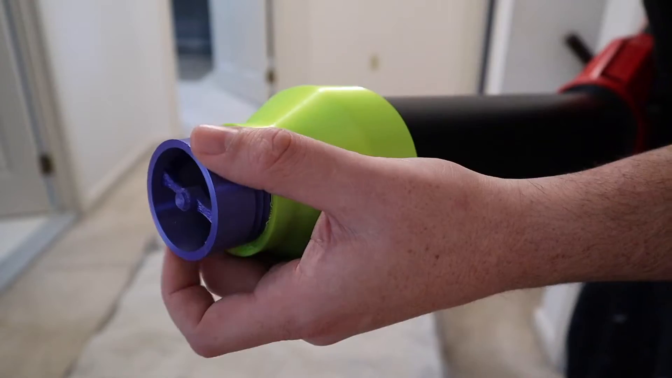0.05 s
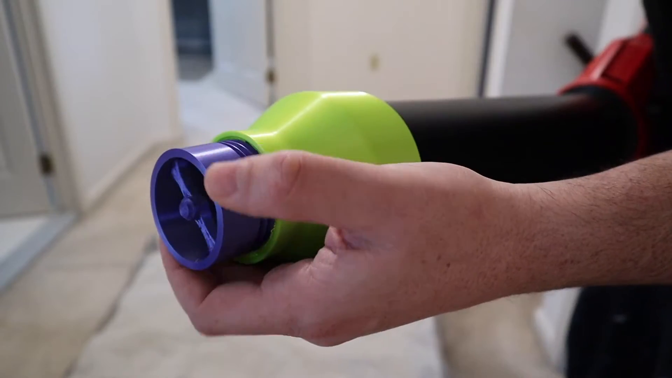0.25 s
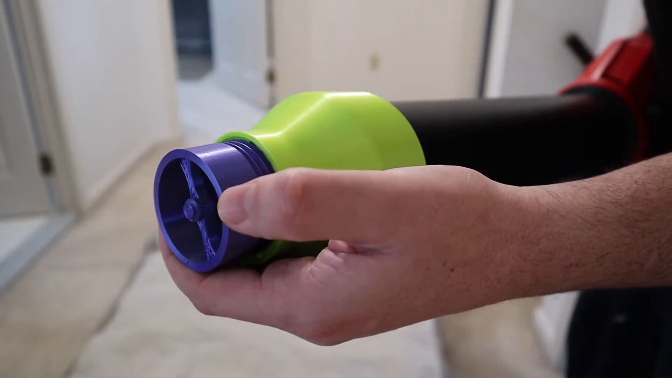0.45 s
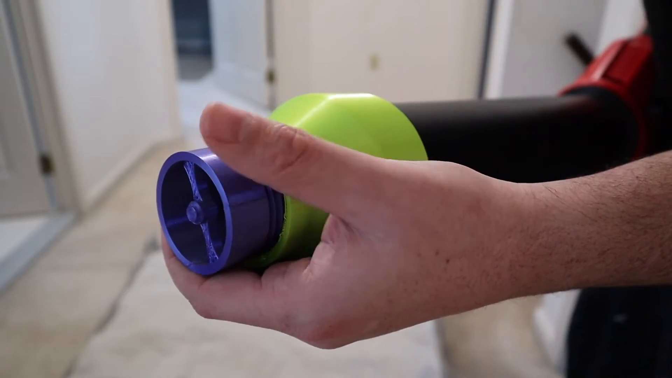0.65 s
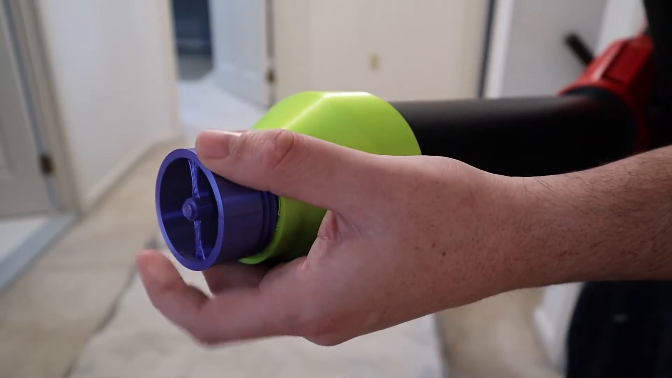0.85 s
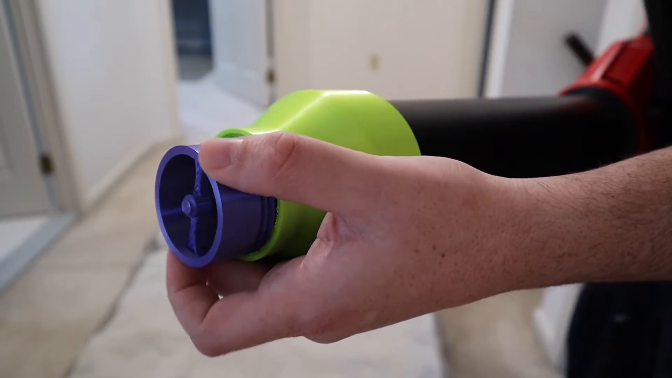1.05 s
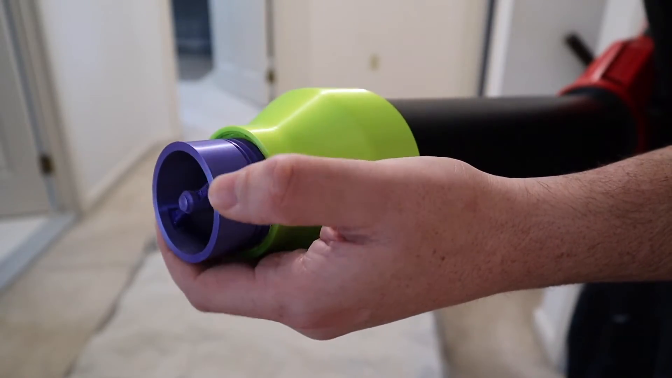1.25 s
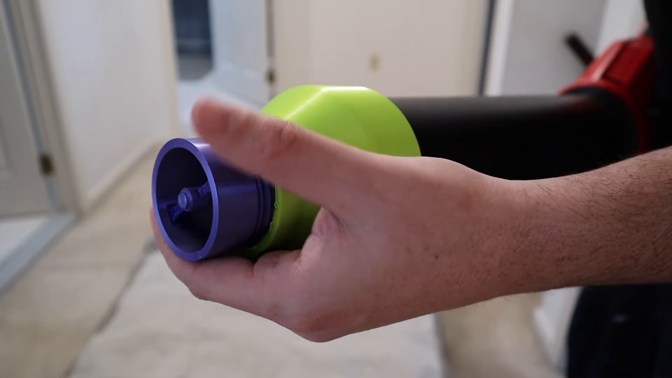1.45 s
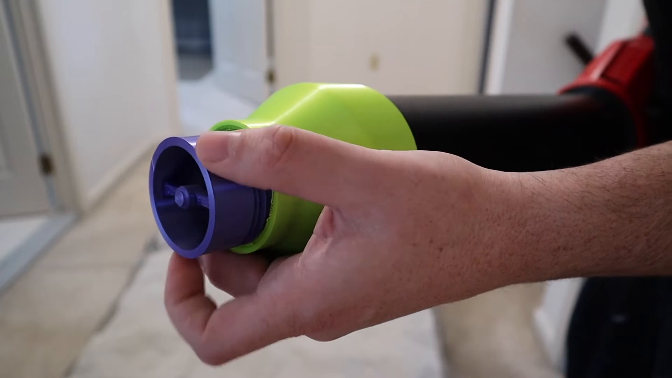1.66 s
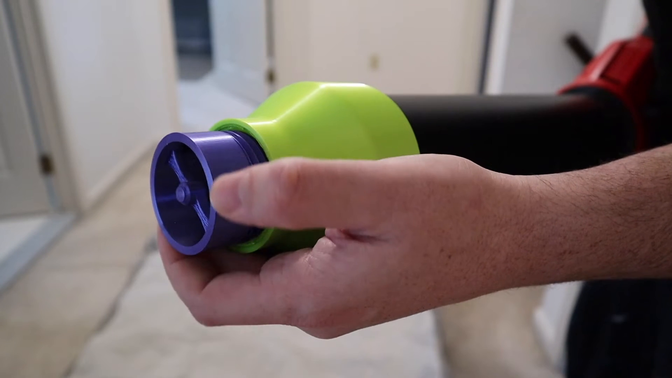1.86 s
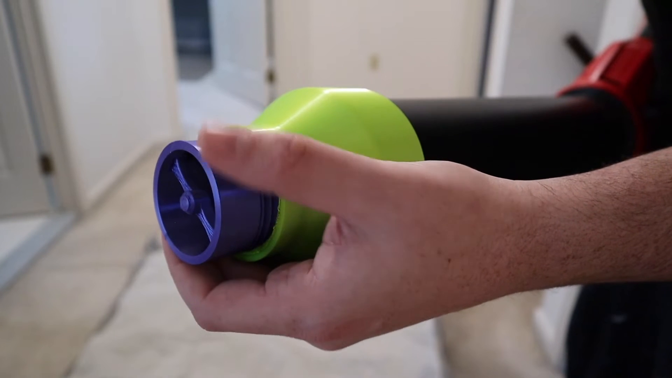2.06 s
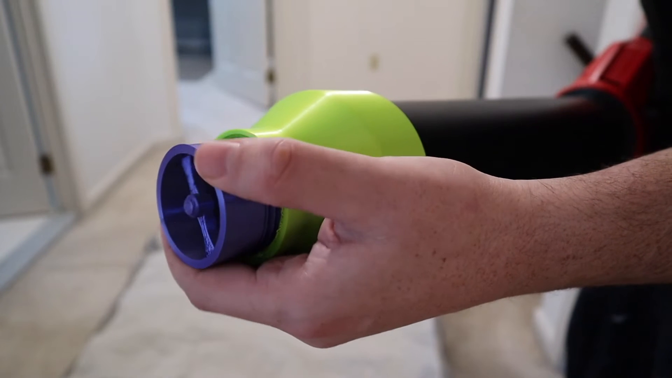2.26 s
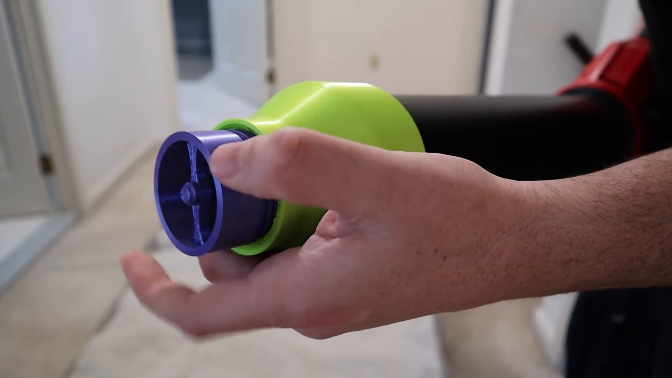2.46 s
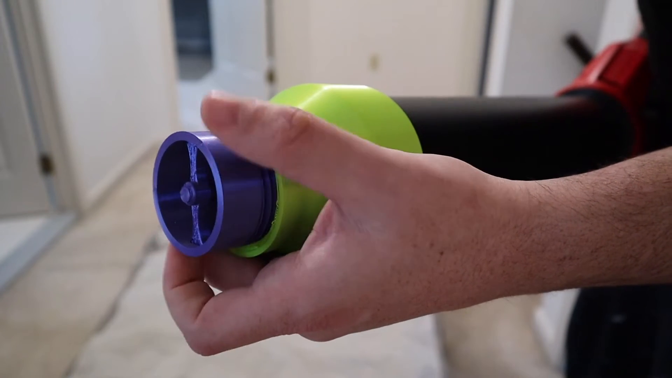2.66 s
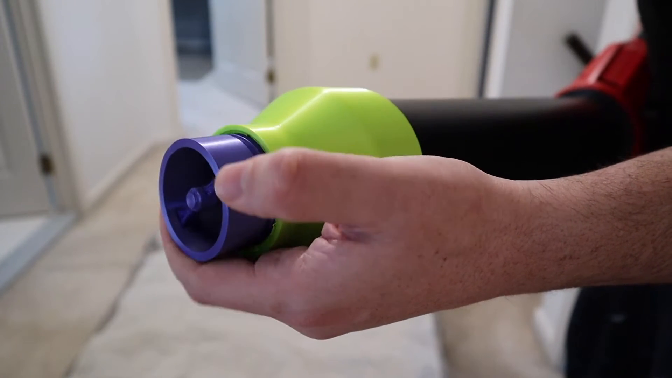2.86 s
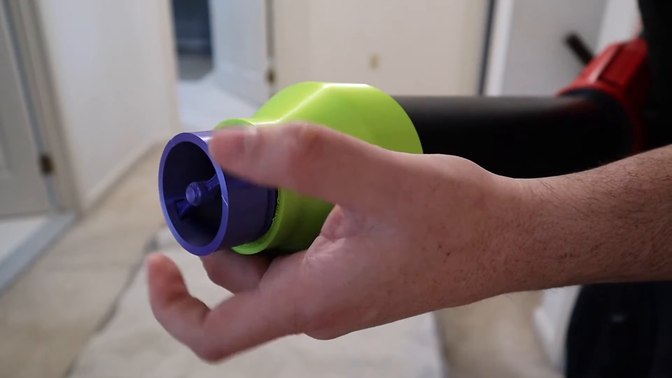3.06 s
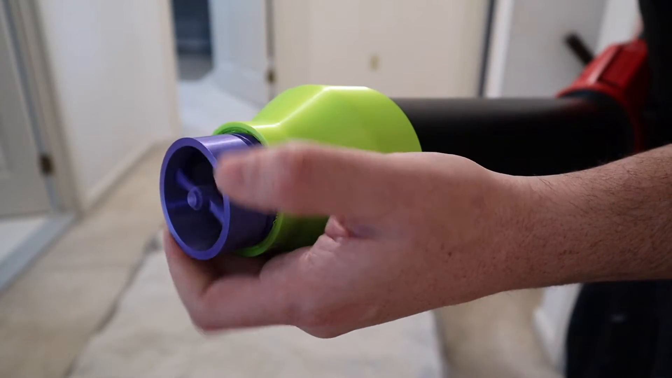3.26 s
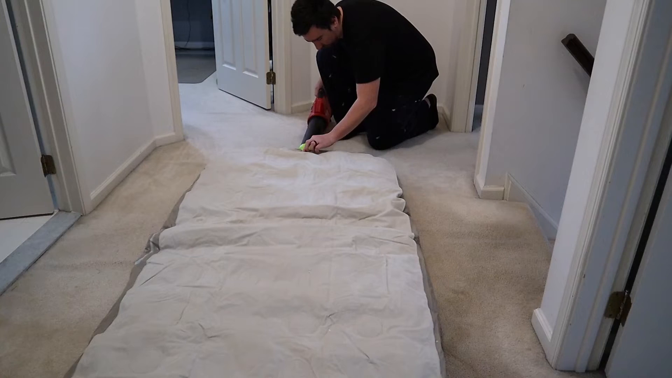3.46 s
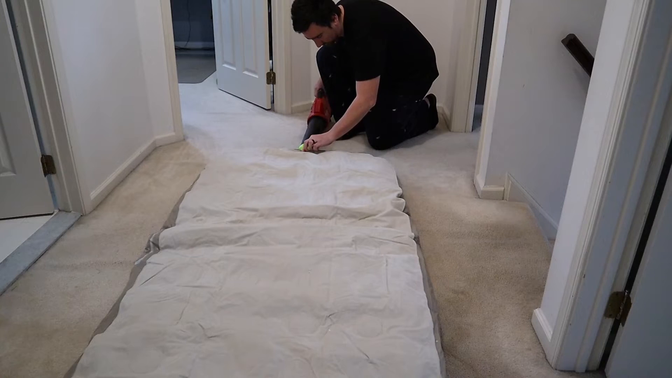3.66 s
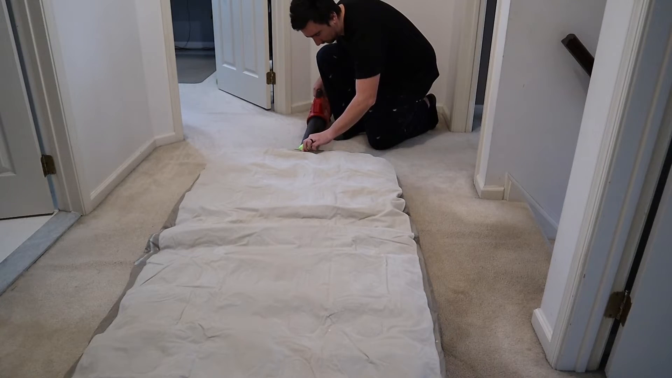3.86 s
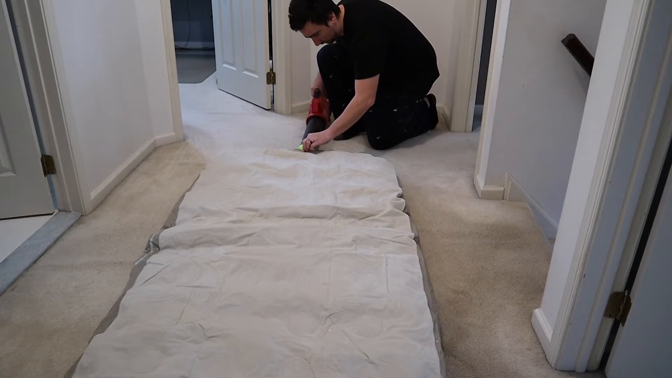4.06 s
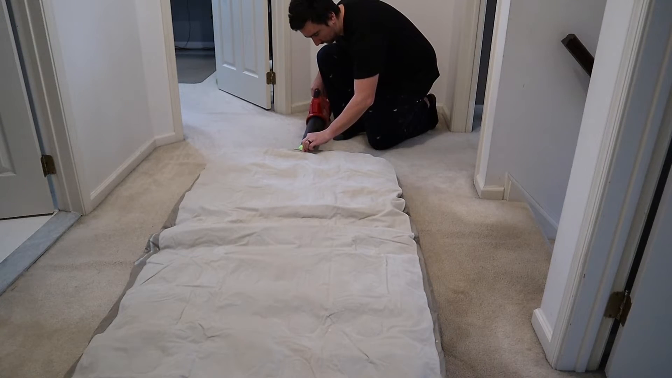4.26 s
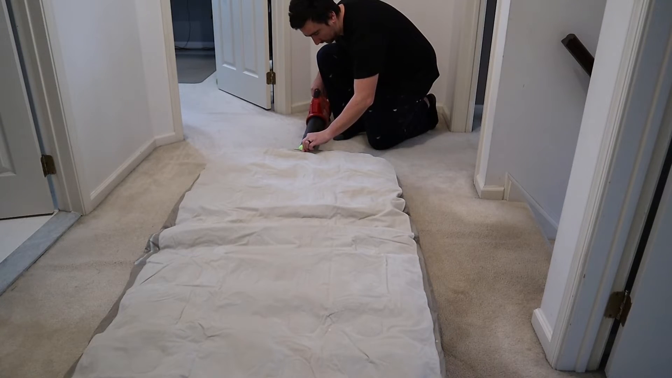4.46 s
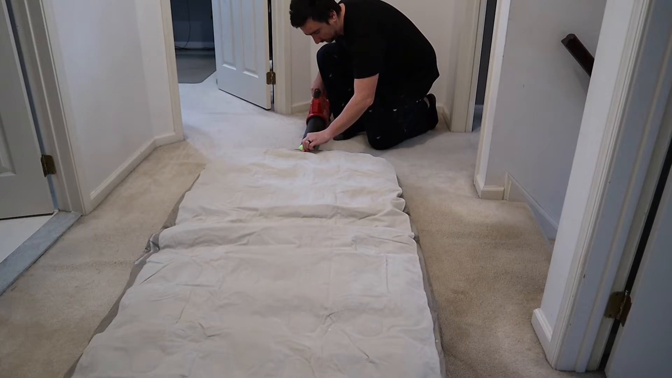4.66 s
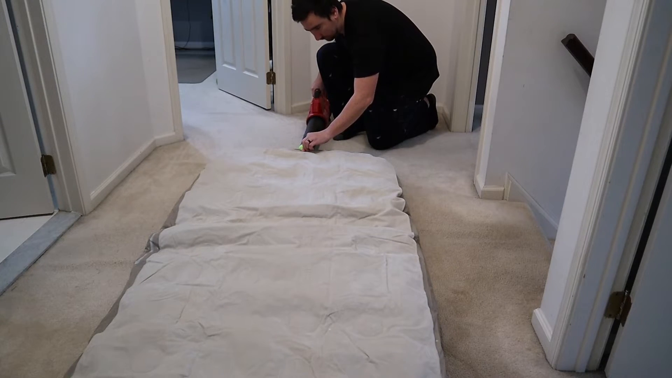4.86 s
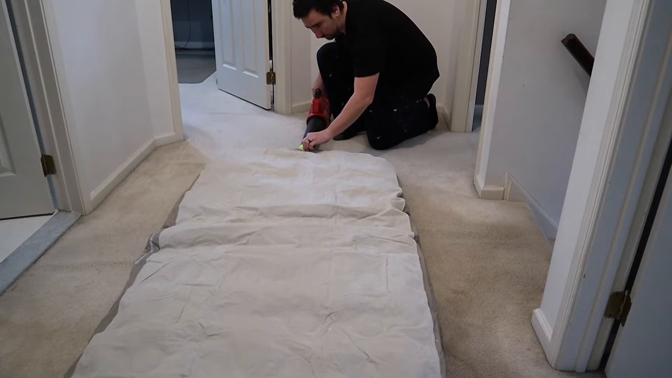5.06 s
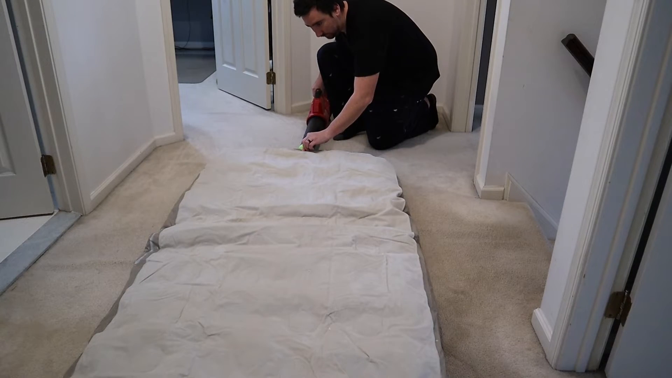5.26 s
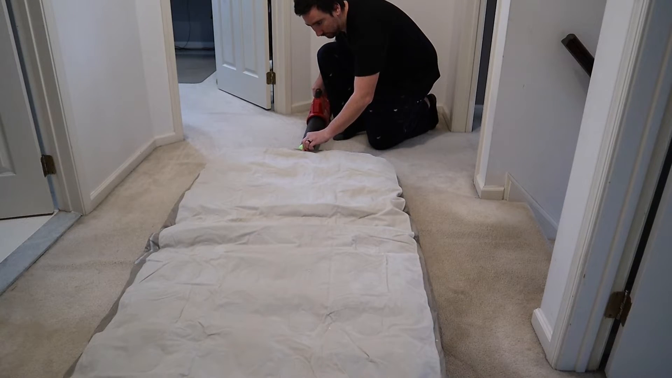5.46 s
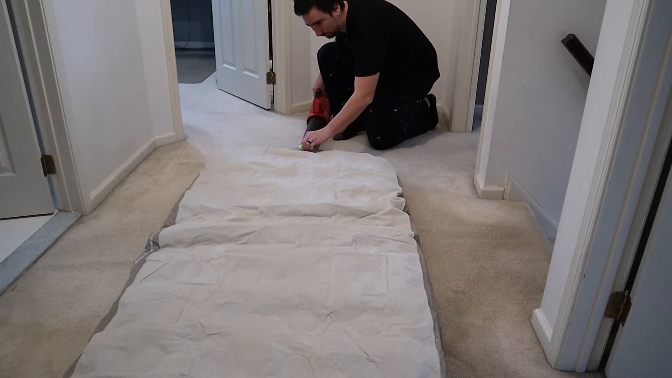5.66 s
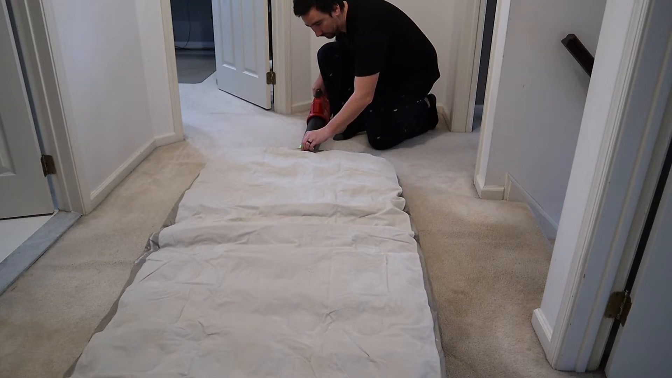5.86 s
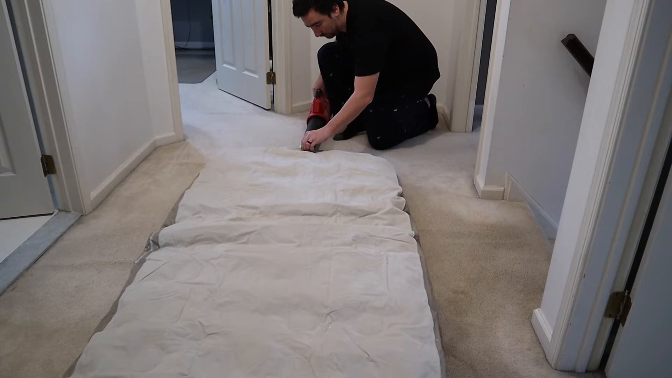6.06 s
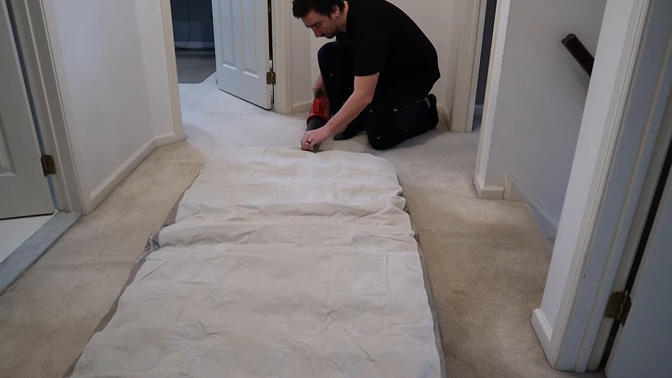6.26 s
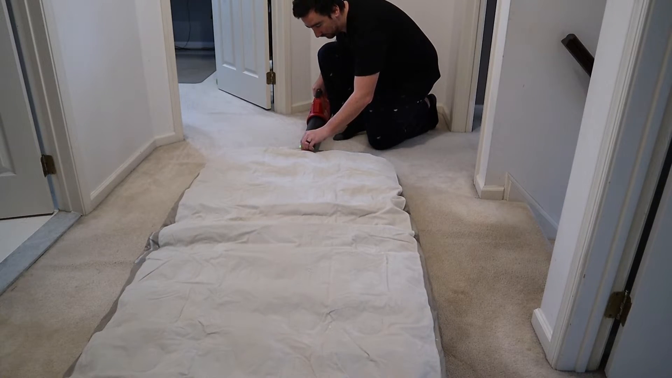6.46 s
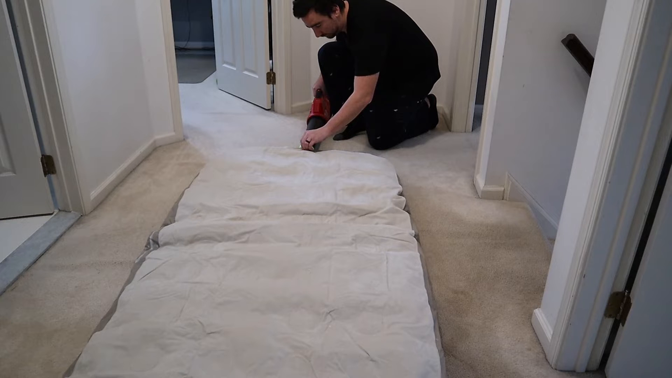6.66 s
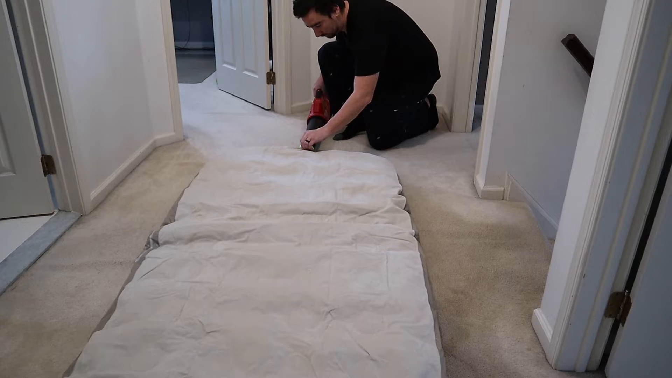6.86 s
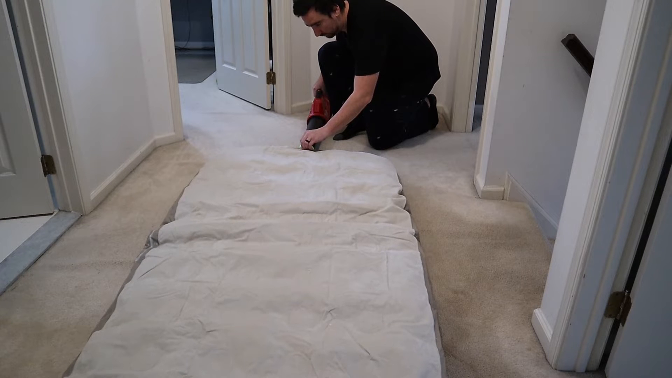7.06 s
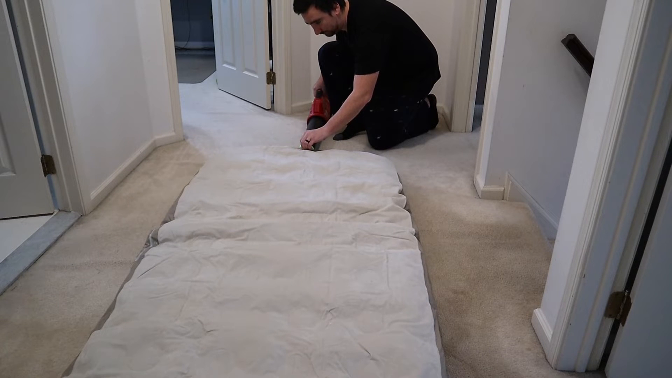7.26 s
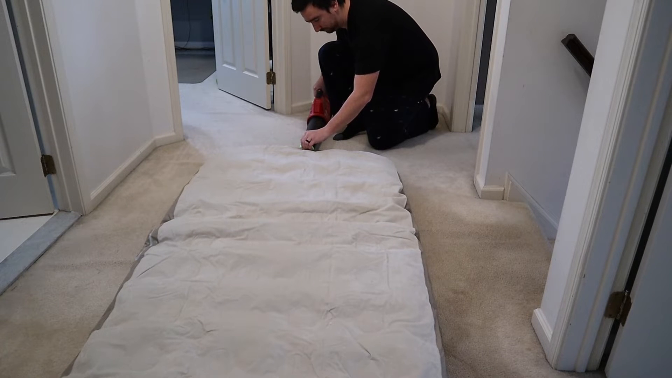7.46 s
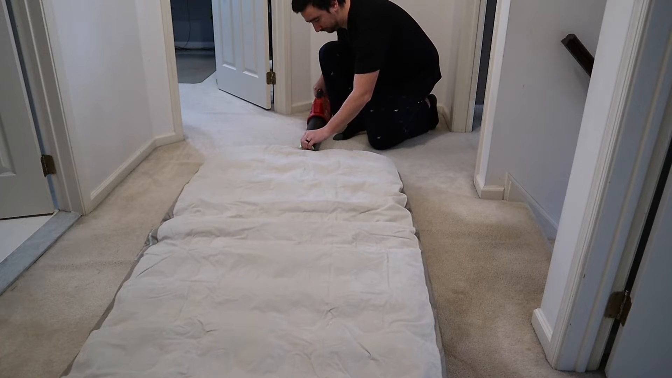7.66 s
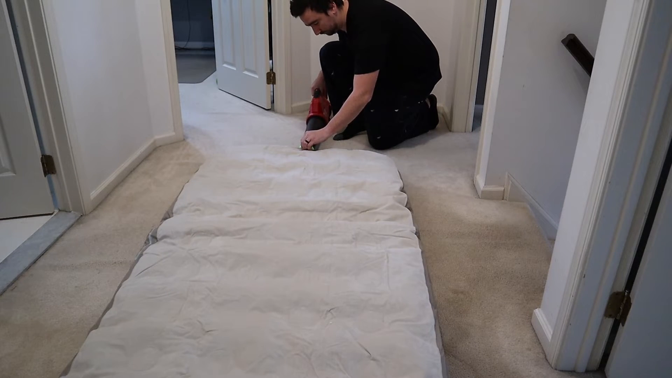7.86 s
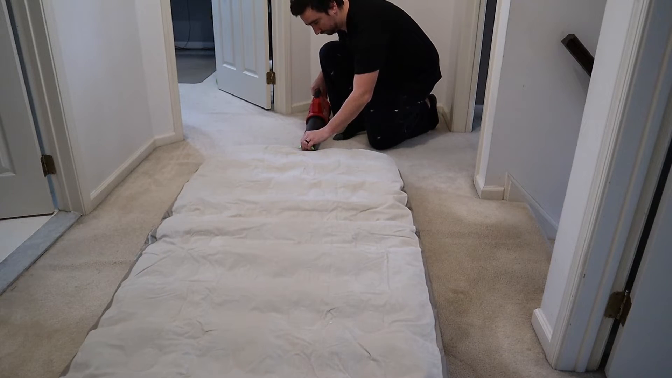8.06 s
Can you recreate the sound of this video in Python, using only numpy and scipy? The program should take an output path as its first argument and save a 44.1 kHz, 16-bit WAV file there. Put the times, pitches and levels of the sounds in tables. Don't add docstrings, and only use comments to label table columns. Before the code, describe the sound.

Hard plastic clicks and hollow scrapes up close, then a cordless blower rattles into a steady airy roar with whine, abruptly jumping to a shrill sped-up hiss.

```python
import sys
import numpy as np
from scipy import signal
from scipy.fft import rfft, irfft, next_fast_len
from scipy.io import wavfile
from scipy.ndimage import uniform_filter1d

SR = 44100
rng = np.random.default_rng(int(sys.argv[2]) if len(sys.argv) > 2 else 0)


def field_ratio(decibels):
    return 10 ** (np.asarray(decibels, dtype=float) / 20)


def put_to_file(sound):
    columns = np.atleast_2d(sound).T
    safe = np.clip(columns, -1, 1)
    whole_steps = np.round(safe * 32767)
    wavfile.write(sys.argv[1], SR, whole_steps.astype(np.int16))


N = 357651
T = np.arange(N) / SR
SCENE_CUT_S, SPEED_CUT_S, FADE_S = 3.408, 6.637, 0.012
SPEED_UP = 3


def unit(x):
    return x / np.sqrt(np.mean(x ** 2))


def curves(table):
    s, *columns = np.transpose(table)
    return [np.interp(T, s, c) for c in columns]


def lookup(x, table):
    return np.interp(x, *np.transpose(table))


def walk(rate):
    k = int(SR / rate)
    steps = np.repeat(rng.standard_normal(N // k + 1), k)
    return unit(uniform_filter1d(uniform_filter1d(steps, k), k)[:N])


def colour(x, points, peaks=(), speed=1):
    size = next_fast_len(N)
    hz = np.arange(size // 2 + 1) * SR / size / speed + 1
    corner_hz, corner_db = np.transpose(points)
    db = np.interp(np.log(hz), np.log(corner_hz), corner_db)
    db = db + sum(g / (1 + (2 * (hz - f) / w) ** 2) for f, w, g in peaks)
    return unit(irfft(rfft(x, size) * field_ratio(db), size)[:N])


def ring(x, hz, width):
    return signal.lfilter(*signal.iirpeak(hz, hz / width, fs=SR), x)


def highpass(x, order, hz):
    return signal.sosfilt(signal.butter(order, hz, "high", fs=SR, output="sos"), x)


def tone(hz, db, flutter_db, rate):
    phase = 2 * np.pi * np.cumsum(hz) / SR
    return np.sqrt(2) * field_ratio(db + flutter_db * walk(rate)) * np.sin(phase)


def brief_tone(table):
    hz, db = curves(table)
    sounding = (T >= table[0][0]) * (T <= table[-1][0])
    return tone(hz + 20 * walk(120), db, 2.5, 70) * sounding


# (frequency [Hz], density [dB per Hz])
FLOOR = [(15, -36), (25, -9), (113, -3), (174, -11), (194, -8), (235, -9.5), (2890, -21), (3300, -22.5),
         (3990, -22), (7030, -24.5), (15800, -26)]


def floor(db, speed=1):
    return field_ratio(db) * colour(rng.standard_normal(N), FLOOR, speed=speed)


# (frequency [Hz], t60 [s], level [dB])
HALL = [(490, 0.18, 3), (880, 0.34, -4.5), (1340, 0.088, -6), (3680, 0.068, -1), (9700, 0.048, 9)]


def hall(x):
    t = T[:SR // 2]
    tail = 0
    for f, t60, db in HALL:
        noise = unit(ring(rng.standard_normal(len(t)), f, f))
        tail = tail + field_ratio(db - 60 * t / t60) * noise
    return signal.fftconvolve(x, tail * np.clip(t / 0.0048, 0, 1))[:N]


def echoes(x, rate):
    bounce = rng.standard_normal((2, 4096)) * np.exp(-T[:4096] / 0.025)
    bounce = highpass(bounce, 4, 1100)
    bounce = bounce / np.sqrt(np.sum(bounce[0] ** 2))
    a, b = signal.oaconvolve(x[None], bounce, axes=1)[:, :N]
    turn = 0.6 * walk(rate)
    return x + field_ratio(-11) * (np.cos(turn) * a + np.sin(turn) * b)


# (peak time [s], length [s], level [dB], hiss level [dB])
STROKES = [(0, 0.2, -56, -70), (0.252, 0.36, -55.5, -60), (0.8, 0.036, -48, -45), (.83, .14, -59, -60),
           (.6, .08, -68, -70), (1.4, .08, -65, -69), (1.747, .08, -63, -68), (2.222, 0.036, -58, -60),
           (2.378, 0.037, -39, -46), (2.83, .04, -42, -44), (1.13, 0.5, -55.5, -56),
           (1.617, 0.27, -52.5, -54), (1.808, 0.26, -56, -53), (2.266, 0.18, -49.5, -50.5),
           (2.43, 0.17, -42, -54), (2.665, 0.33, -56, -63), (2.826, 0.41, -45.5, -53.5),
           (3.21, 0.05, -40.5, -53), (3.272, 0.11, -41, -45.5), (3.355, 0.1, -54, -61),
           (3.517, 0.17, -63, -67), (3.907, 0.34, -64.5, -77)]


def stroke_db():
    rise_share, edge_db = 0.43, -18
    rest_db, rest_hiss_db = -75, -77
    power = field_ratio(2 * np.array([[rest_db], [rest_hiss_db]])) * (T < SCENE_CUT_S) + 1e-12
    for s, length, db, hiss_db in STROKES:
        away = np.maximum((s - T) / rise_share, (T - s) / (1 - rise_share)) / length
        power = power + field_ratio(2 * (np.array([[db], [hiss_db]]) + edge_db * away))
    return 10 * np.log10(power)


# (frequency [Hz], density [dB per Hz])
RUB_BODY = [(71, -49), (120, -7), (318, -2.5), (720, 1.5), (929, -5), (1070, -4.5), (2080, -13.5),
            (3500, -29), (4550, -55), (7700, -120)]
# (frequency [Hz], density [dB per Hz])
RUB_HISS = [(2000, -6), (3800, 4.5), (6000, -4.5), (7800, -4), (10000, -6), (12500, -9), (15500, -21)]


def rub():
    body_db, hiss_db = stroke_db()
    grip_surge_db = 1.4 * walk(60)
    grains = rng.standard_normal(N) * field_ratio(1.9 * rng.exponential(size=N) + grip_surge_db)
    body = field_ratio(body_db - 0.5) * colour(grains, RUB_BODY)
    return body + field_ratio(hiss_db - 3.0) * colour(grains, RUB_HISS)


# (time [s], frequency [Hz], level [dB])
CHIRPS = [
    [(0, 1720, -70), (.07, 1800, -71), (.13, 1850, -80)],
    [(.62, 9400, -84), (.655, 8900, -73), (.675, 8550, -82)],
    [(2.57, 1650, -72), (2.62, 1700, -64), (2.7, 1680, -68), (2.73, 1650, -78)],
    [(2.97, 1600, -74), (3.08, 1480, -71), (3.18, 1480, -71)],
]
# (time [s], frequency [Hz], level [dB])
SCRAPES = [
    [(2.58, 3450, -80), (2.62, 3500, -72), (2.66, 3450, -80)],
    [(3.0, 3550, -82), (3.08, 3500, -79), (3.16, 3450, -82)],
]
# (time [s], frequency [Hz], level [dB])
RINGS_ON = [
    [(1.81, 885, -53), (1.86, 885, -54), (1.95, 883, -70), (1.98, 883, -82)],
    [(2.85, 830, -50), (2.92, 830, -56), (2.97, 850, -66)],
    [(.02, 2550, -82), (.08, 2560, -75), (.15, 2570, -84)],
    [(2.86, 1300, -58), (2.93, 1290, -62), (3.0, 1280, -76)],
    [(.02, 8650, -80), (.16, 8600, -74), (.2, 8500, -84)],
    [(.55, 8450, -84), (.585, 8450, -76), (.62, 8400, -84)],
    [(.69, 780, -78), (.72, 780, -67), (.77, 775, -66), (.79, 775, -76)],
]
# (time [s], frequency [Hz], level [dB])
PING = [(0, 1975, -72), (.1, 1980, -69), (.2, 1985, -72), (.29, 1985, -84)]
# (time [s], frequency [Hz], level [dB])
PING_PARTNER = [(0, 1830, -74), (.1, 1850, -73), (.2, 1860, -84)]


def squeaks_and_rings():
    return sum(brief_tone(line) for line in [PING, PING_PARTNER, *CHIRPS, *SCRAPES, *RINGS_ON])


# (time [s], level [dB])
TICKS = [(.7855, -45), (.761, -52), (.8, -29.5), (.8125, -31), (.844, -50), (1.0348, -46), (1.043, -50),
         (1.066, -48), (1.082, -54), (1.093, -44), (1.1, -46), (1.108, -48), (1.117, -52), (1.254, -46),
         (.795, -44), (1.134, -37.5), (1.1886, -44), (1.599, -37), (1.63, -36), (1.667, -41),
         (1.794, -29.5), (1.8097, -34.5), (1.846, -32), (2.2274, -16.5), (2.2288, -32), (2.2556, -22),
         (2.2781, -43), (2.218, -46), (2.324, -46), (2.538, -50), (2.4785, -47), (2.567, -49), (1.504, -48),
         (.024, -56), (.166, -56), (2.3519, -36), (2.3717, -34), (2.3839, -28), (2.4392, -38),
         (2.7363, -36), (2.8215, -27), (2.8377, -19), (3.188, -39), (3.2071, -26.5), (3.235, -33.5),
         (3.297, -38), (3.4005, -47)]
# (frequency [Hz], width [Hz], level [dB])
TICK_MODES = [(4130, 1400, 8.5), (5640, 390, 1.5), (7560, 990, 11), (9600, 820, -25), (12200, 2000, 8.5),
              (15000, 1000, -5)]


def ticks():
    out, t = np.zeros(N + 512), T[:512]
    small_ticks = 260
    when = rng.uniform(0, SCENE_CUT_S, small_ticks)
    small_db = np.interp(when, T, stroke_db()[1]) + 2.5 + 2.5 * rng.exponential(size=small_ticks)
    for s, db in [*TICKS, *zip(when, small_db)]:
        noise = rng.standard_normal(512)
        push = noise * np.exp(-t / 0.001) * np.clip(t / 0.0007, 0, 1)
        click = 0
        for (f, w, g), chance in zip(TICK_MODES, noise[::-1]):
            bright_db = -6 * (f > 9000)
            click = click + field_ratio(g + 2.2 * chance + bright_db) * ring(push, f, w)
        out[int(s * SR):][:512] += field_ratio(db + 4.0) * click / np.abs(click).max()
    return out[:N]


# (time [s], level [dB], length [ms], tube pitch [Hz], wall ring [dB])
KNOCKS = [(.3367, -40, 3.9, 646, -2), (.588, -54, 4.9, 398, 0), (.7605, -42.5, 5.7, 380, 5),
          (.7995, -25.5, 4.4, 358, 12.5), (1.028, -49.5, 18, 400, 3), (1.0943, -43, 18, 620, 4),
          (1.1349, -36, 1.9, 624, -3), (1.542, -34, 2.4, 766, 3), (1.5975, -27, 4.5, 870, 5),
          (1.788, -36, 8, 760, -7), (1.801, -27.5, 3.7, 630, 4.5), (1.8446, -42, 4.1, 880, -9),
          (2.209, -46, 3.6, 480, -2), (2.2285, -27.5, 2.7, 730, 2), (2.2507, -41, 6.6, 840, 7),
          (2.3505, -33, 4.9, 630, 6), (2.371, -26, 11, 760, 8.5), (2.4395, -32, 1.8, 730, 4),
          (2.4671, -36, 3, 750, 3), (2.5574, -38, 0.84, 1110, 13), (2.648, -45, 8.3, 800, 8),
          (2.7365, -23, 1.8, 800, -3), (2.821, -22.5, 6.6, 900, 3), (2.8365, -22.5, 3.6, 800, 1),
          (2.9525, -40.5, 4.7, 696, -6), (3.187, -32.5, 3.3, 900, 8), (3.2378, -36, 8, 640, 2),
          (3.248, -38, 14, 750, 7), (3.2875, -29.5, 4.8, 905, -1), (3.3964, -42.5, 6.2, 720, 3),
          (1.567, -36, 3, 900, -10), (2.656, -40, 4, 800, 3), (2.668, -32, 4.9, 800, -5),
          (2.96, -42, 3.6, 900, 6), (3.193, -33, 5.1, 895, 6), (3.2075, -41, 2, 800, -2),
          (3.297, -32, 4.1, 1050, 0), (.8124, -33, 4.9, 397, 7), (.864, -43, 7.1, 420, -8),
          (2.827, -29, 2.9, 1210, -2)]
# (time [s], level [dB], length [ms])
BUMPS = [(.273, -48, 5.3), (0.3213, -35, 3.8), (.787, -37, 13), (.83, -36.5, 11), (0.851, -44, 4.9),
         (1.1477, -43, 5), (1.395, -62, 9.6), (.6, -63, 8.2), (1.575, -45, 6.7), (1.629, -44, 3.1),
         (1.662, -49, 7), (1.832, -42.5, 13), (2.2766, -43, 4), (2.423, -40, 21), (2.478, -39, 4.7),
         (2.662, -32.5, 6), (2.758, -37, 3), (2.905, -47, 5), (2.7687, -40, 6.4), (2.8, -49, 3.5),
         (2.8527, -40, 4.8), (2.8683, -52, 6), (3.215, -42, 6.6), (3.31, -33, 2.6), (3.319, -51, 3),
         (1.609, -38, 8), (1.642, -43, 9), (1.742, -54, 14), (1.852, -43, 5.1), (2.448, -40, 4.5),
         (1.208, -51, 5), (.36, -49, 4)]
# (frequency [Hz], width [Hz], level [dB])
WALL_MODES = [(1310, 300, 21), (1860, 190, 11.5), (2360, 160, -14), (3400, 280, 1)]


def knocks():
    out, t = np.zeros(N + 4096), T[:4096]
    bump_hz, soft_wall_db = 800, -16
    blows = KNOCKS + [(*row, bump_hz, soft_wall_db) for row in BUMPS]
    for s, db, ms, hz, wall_db in blows:
        noise, size = rng.standard_normal((2, 4096))
        length = max(ms, 1) / 1000
        attack = np.clip(t / (0.23 * length), 0, 1)
        decay = np.exp(-np.clip(t - 0.67 * length, 0, 1) / (0.46 * length + 0.0014))
        push = noise * field_ratio(2.34 * size) * attack * decay
        column = ring(ring(push, hz, 0.99 * hz), hz, 1.3 * hz)
        wall = sum(field_ratio(g) * ring(push, f, w) for f, w, g in WALL_MODES)
        blow = unit(column) + field_ratio(wall_db - 7.5) * unit(ring(wall, 2620, 2400))
        loudest = np.sqrt(uniform_filter1d(blow ** 2, size=130).max())
        out[int(s * SR):][:4096] += field_ratio(db - 2.0) * blow / loudest
    return out[:N]


# (frequency [Hz], width [Hz], level [dB])
TUBE_RINGS = [(184.4, 10, 11.5), (338, 70, 5.5), (420, 160, 0), (560, 61, -11), (720, 30, -6.5),
              (870, 24, 3.5), (1070, 40, -10), (1213, 50, -3.5), (1410, 46, -15), (1820, 45, -5),
              (2150, 60, -9)]


def tube(x):
    return highpass(x, 3, 290) + sum(field_ratio(db) * ring(x, hz, width) for hz, width, db in TUBE_RINGS)


# (time [s], frequency [Hz], level [dB])
WHINE = [(4.055, 7800, -72), (4.064, 7800, -54), (4.095, 7750, -50), (4.103, 7500, -49), (4.12, 7450, -52),
         (4.13, 7400, -64)]


def drive_whine():
    return brief_tone(WHINE)


# (peak time [s], length [s], frequency [Hz], waver [Hz], level [dB])
BUZZES = [
    (4.075, .007, 2900, 150, -43),
    (4.087, .012, 2950, 200, -36),
    (4.118, .05, 1260, 18, -32),
    (4.135, .06, 1530, 35, -36),
    (4.157, .04, 600, 30, -29),
    (4.155, .04, 410, 20, -34),
    (4.19, .05, 570, 20, -35),
    (4.46, .08, 600, 30, -33),
]


def kick():
    start_s, attack_s, hold_s = 4.072, 0.03, 0.11
    rise_db = -28 * np.maximum(1 - (T - start_s) / attack_s, 0)
    fall_db = -400 * np.maximum(T - start_s - attack_s - hold_s, 0)
    shake = rng.standard_normal(N) * field_ratio(2.0 * walk(250))
    out = field_ratio(-27 + rise_db + fall_db) * unit(ring(ring(shake, 2850, 800), 2850, 800))
    for s, length, hz, waver, db in BUZZES:
        swell = np.exp(-(2 * (T - s) / length) ** 4)
        out = out + tone(hz + waver * walk(120), db, 2, 80) * swell
    return out


# (frequency [Hz], density [dB per Hz])
AIR = [(29, -55), (50, -89), (94, -18), (234, -13.5), (270, -10.5), (406, -4.5), (447, -7), (742, -6.5),
       (857, -12), (944, -4.5), (2660, -5), (2860, -2), (3070, -7.5), (8900, -15), (9900, -21),
       (13000, -23.5), (15800, -31.5)]
# (shaft frequency [Hz], level [dB])
SHAFT_PATH = [(185, -27), (220, 5.5), (231, 2), (239, 0)]
SHAFT_LINES = (-42, -41.5, -65)


def blower(shaft_hz, blade_db, motor_db, roar_db, shares, edges_hz, trim_db, line_db, speed, duct):
    air = rng.standard_normal(N) * field_ratio(0.42 * walk(300 * speed))
    air = colour(echoes(air, 1.5 * speed), AIR, duct, speed)
    lows = [signal.sosfiltfilt(signal.butter(3, f, fs=SR, output="sos"), air) for f in edges_hz]
    bands = np.diff([0 * air, *lows, air], axis=0)
    gains = (shares[0], 0, *shares[1:])
    out = np.zeros(N)
    for band, gain_db, trim in zip(bands, gains, trim_db):
        out += unit(band) * field_ratio(roar_db + gain_db + trim + 0.58 * walk(9 * speed))
    lag = 1 - shaft_hz / shaft_hz.max()
    shaft_hz = shaft_hz * (1 + 0.0002 * walk(25 * speed) + 0.055 * lag * walk(180))
    blade_trim_db, motor_trim_db, shaft_trim_db = line_db
    out += tone(12 * shaft_hz, blade_db + blade_trim_db, 0.8, 30)
    out += tone(16 * shaft_hz, motor_db + motor_trim_db, 2.8, 90)
    path_db = lookup(shaft_hz / round(speed), SHAFT_PATH)
    for order, db in zip((1, 3, 9), SHAFT_LINES):
        out += tone(order * shaft_hz, db + roar_db + shaft_trim_db + path_db, 1.9, 8 * speed)
    return out


# (gap at 4.14 s [Hz], time constant [s])
SPEED_GAPS = [(60, .175), (40, .035)]
# (time [s], shaft frequency [Hz])
HUNT = [(4.58, 241), (4.74, 241), (4.93, 240.4), (4.98, 240.9), (5.09, 240.1), (5.35, 240.2), (5.4, 239.4),
        (5.62, 239.3), (5.71, 241.2), (5.8, 241.1), (5.92, 239.3), (6.05, 239.3), (6.1, 240.4),
        (6.33, 241.2), (6.45, 239.2), (6.52, 240.2), (6.63, 240.3)]
# (time [s], level [dB])
SWELL = [(4.58, -7.5), (4.74, -2), (4.93, 0), (4.98, 4.5), (5.09, -5), (5.35, -1.5), (5.4, -5),
         (5.62, -3.5), (5.71, 2), (5.8, 2.5), (5.92, -6), (6.05, -8), (6.1, -0.5), (6.33, 0), (6.45, -7),
         (6.52, -1.5), (6.63, -.5)]
# (frequency [Hz], level [dB])
BLADE_PATH = [(1100, -75), (2150, -44), (2250, -34), (2330, -40), (2420, -26), (2490, -21), (2530, -24),
              (2570, -37), (2650, -38), (2720, -40), (2770, -32), (2810, -33), (2835, -29)]
# (frequency [Hz], level [dB])
MOTOR_PATH = [(1500, -75), (2400, -46), (2580, -26), (2750, -30), (2930, -20), (3020, -24), (3080, -30),
              (3150, -25), (3240, -22), (3310, -38), (3460, -40), (3550, -31), (3610, -42), (3650, -30),
              (3710, -40), (3790, -33), (3850, -42)]
# (time [s], roar level [dB])
FLOW_DB = [(4.05, -63), (4.09, -40.5), (4.13, -26.5), (4.18, -23.5), (4.4, -25), (5.1, -27.5), (6.63, -29)]
# (frequency [Hz], width [Hz], level [dB])
DUCT = [(150, 33, 4), (288, 30, 0), (413, 20, 6), (455, 57, -4.5), (567, 53, 8), (621, 22, -11),
        (639, 18, 13), (766, 22, 10), (880, 100, -3), (951, 28, 9), (1003, 55, -6.5), (1172, 27, 5.5),
        (1272, 47, -9), (1584, 90, 2), (1840, 72, 0), (1872, 18, 6.5), (2125, 20, 5), (2807, 230, -7),
        (3230, 310, 4.5)]


def run_up():
    gap_hz = sum(hz * np.exp(np.minimum((4.14 - T) / s, 5)) for hz, s in SPEED_GAPS)
    shaft_hz = np.maximum(curves(HUNT)[0] - gap_hz, 60)
    blade_db = lookup(12 * shaft_hz, BLADE_PATH) + curves(SWELL)[0]
    motor_db = lookup(16 * shaft_hz, MOTOR_PATH) - 4 * np.maximum(T - HUNT[0][0], 0)
    lag = np.minimum(1 - shaft_hz / shaft_hz.max(), 0.38) ** 2
    rumble_db, housing_db, hiss_db = -12.5 - 23 * lag, -1 - 36 * lag, -5.5 - 44 * lag
    puff_db = 23 * np.exp(-np.maximum(T - 4.07, 0) / 0.013)
    air = blower(shaft_hz, blade_db, motor_db, roar_db=curves(FLOW_DB)[0],
                 shares=[rumble_db, housing_db + puff_db, hiss_db + puff_db],
                 edges_hz=(300, 2000, 4500), trim_db=(-1.5, -0.56, -1.87, 0.33),
                 line_db=(3.5, -0.3, 27), speed=0.99, duct=DUCT)
    return air * np.clip((T - 4.068) / 0.0088, 0, 1)


# (frequency [Hz], width [Hz], level [dB])
FILLED_DUCT = [(640, 17, -2), (652, 30, 3), (930, 26, 7), (955, 30, -8), (1233, 72, -6), (1247, 30, 8),
               (1410, 48, 3), (2120, 160, 3.5), (2160, 22, -7)]


def sped_up():
    since = np.maximum(T - SPEED_CUT_S, 0)
    blade_db = -30.5 - 9 * np.maximum(T - 7.33, 0)
    return blower(722.5 - 1.7 * since, blade_db, motor_db=-41.5, roar_db=-31 + 0.32 * since,
                  shares=(-12, -3, -2.5), edges_hz=(900, 4500, 7800), trim_db=(0.074, 0.12, 0.07, 2.6),
                  line_db=(2.5, -4, 30), speed=SPEED_UP, duct=DUCT + FILLED_DUCT)


def scene():
    hand = knocks() + ticks()
    hand = hand + field_ratio(-44.5) * hall(hand)
    hand = hand * np.clip((SCENE_CUT_S - T) / 0.0023, 0.05, 1)
    near = tube(hand + rub() * (T < 4.08)) + squeaks_and_rings()
    first = floor(-63.5) + near + drive_whine() + kick() + run_up()
    fast = floor(-68.5, SPEED_UP) + sped_up()
    over = np.clip((T - SPEED_CUT_S) / FADE_S + 0.5, 0, 1)
    mono = np.sqrt(1 - over) * first + np.sqrt(over) * fast
    return np.array([mono, mono])


# (low edge [Hz], high edge [Hz])
FLECK_BANDS = [(5000, 6400), (5600, 7000), (5600, 7000), (4600, 5900), (6900, 8300), (8200, 9700),
               (11500, 13200), (13000, 14500), (14200, 15800)]


def stereo_flecks(x):
    side = np.zeros(N)
    window = np.sin(np.pi * np.arange(2048) / 2048)
    hz = np.arange(1025) * SR / 2048
    for place, band in rng.uniform(size=(52, 2)):
        start = 155 + 1024 * int(place * (N // 1024 - 3))
        low, high = FLECK_BANDS[int(band * len(FLECK_BANDS))]
        inside = (hz > low) & (hz < high)
        spectrum = np.abs(rfft(x[0, start:start + 2048] * window))
        size = np.median(spectrum[inside]) * field_ratio(-5)
        noise = rfft(rng.standard_normal(2048)) / 20
        side[start:start + 2048] += window * irfft(inside * size * noise)
    return x + np.array([side, -side])


def band_limit(x):
    return signal.sosfilt(signal.butter(12, 17090, fs=SR, output="sos"), x)


def record(dry):
    top_cut = signal.ellip(10, 0.2, 80, 15850, fs=SR, output="sos")
    mix = stereo_flecks(signal.sosfilt(top_cut, dry))
    return band_limit(mix)


dry = scene()
out = record(dry)
put_to_file(out)
```